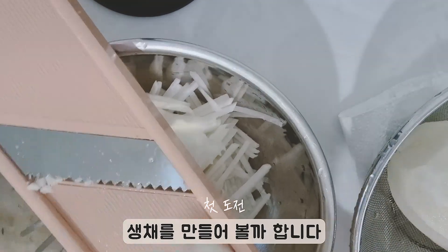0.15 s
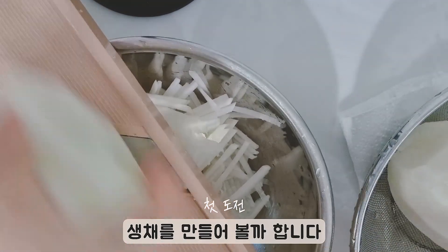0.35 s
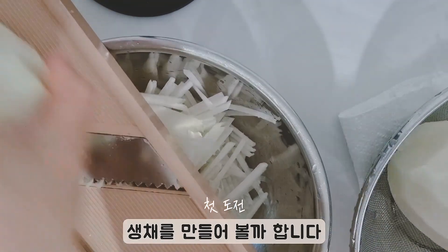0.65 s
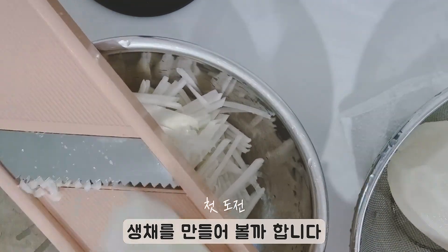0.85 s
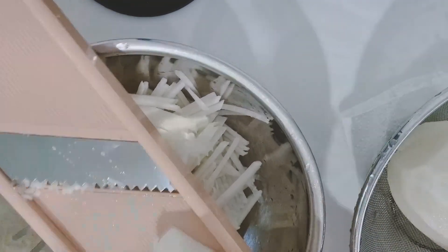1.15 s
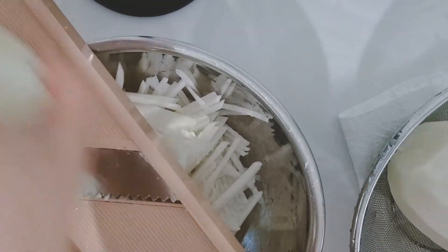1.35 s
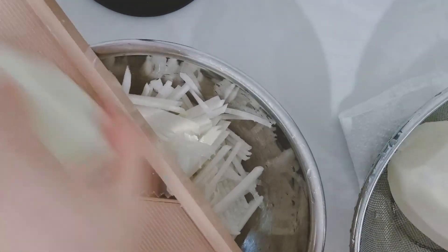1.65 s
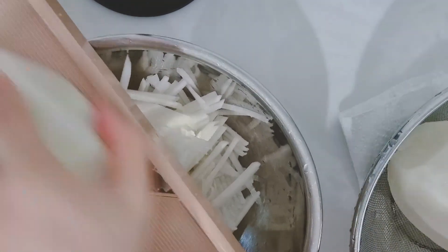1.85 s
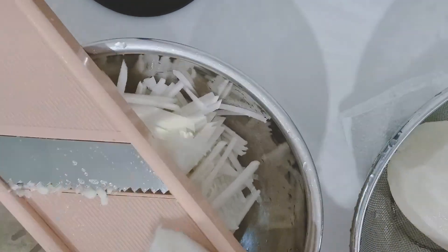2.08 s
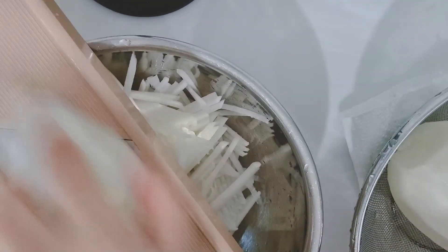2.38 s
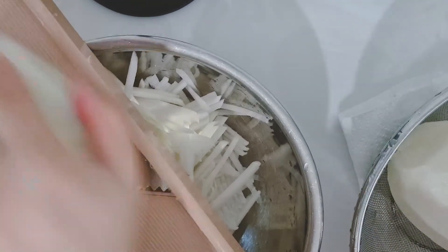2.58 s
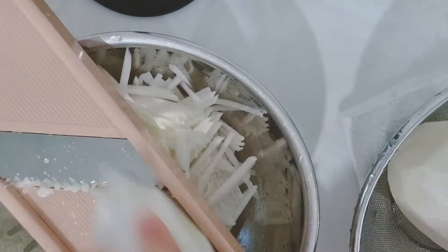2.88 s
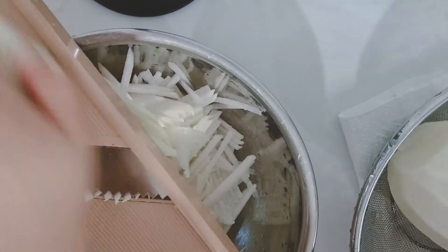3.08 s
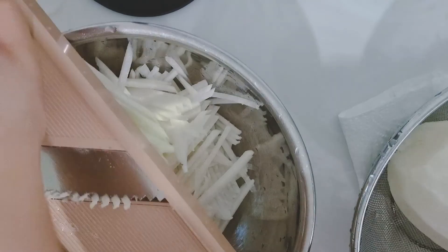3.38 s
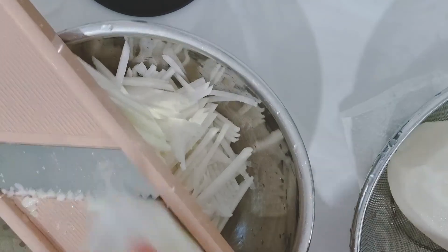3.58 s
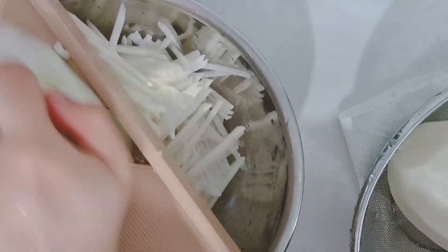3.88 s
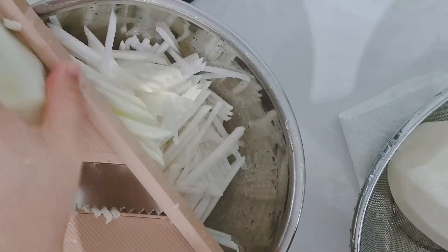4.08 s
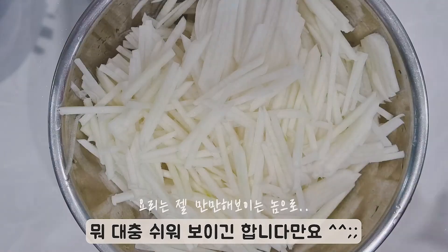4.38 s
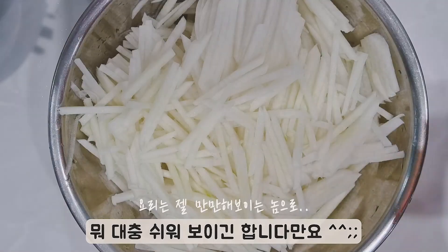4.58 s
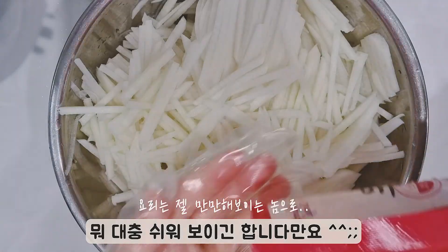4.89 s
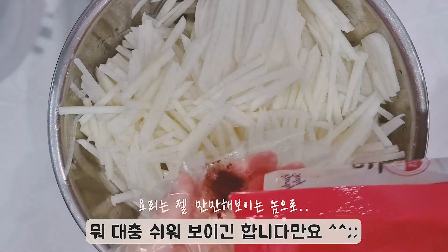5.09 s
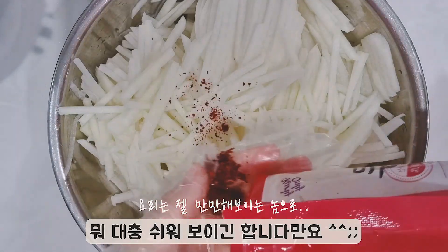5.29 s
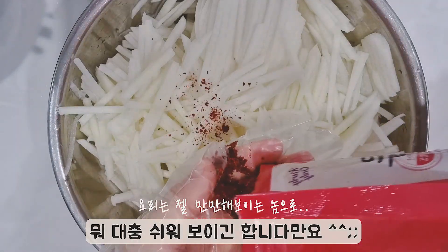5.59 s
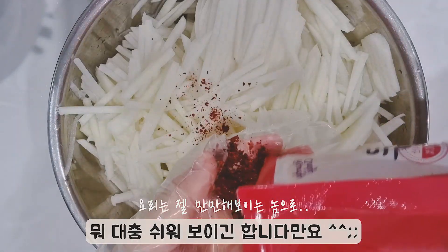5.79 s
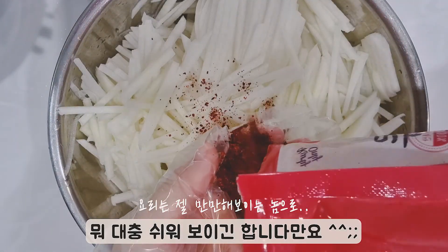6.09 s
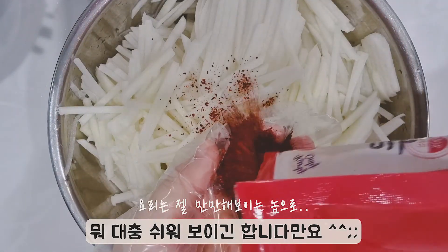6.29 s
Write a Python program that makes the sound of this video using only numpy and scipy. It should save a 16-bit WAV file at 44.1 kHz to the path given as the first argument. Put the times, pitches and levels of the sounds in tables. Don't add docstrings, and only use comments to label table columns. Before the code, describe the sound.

Close up in a quiet kitchen, a firm radish is pushed over a toothed plastic slicer about three times a second: crunchy wet tearing, a short rub back, a hollow knock with a low counter thud. The sound cuts abruptly to a much quieter scene, where a thin plastic bag crinkles in small irregular bursts above a low fridge hum. Close stereo microphones, little echo.

```python
import sys
import numpy as np
from scipy import signal
from scipy.fft import rfft, irfft, next_fast_len
from scipy.io import wavfile
from scipy.ndimage import uniform_filter1d

SR = 44100
rng = np.random.default_rng(int(sys.argv[2]) if len(sys.argv) > 2 else 0)


def volts_from_decibels(level):
    exponent = np.asarray(level, float) / 20
    return 10 ** exponent


def pcm_store(signal):
    levels = np.round(np.clip(np.atleast_2d(signal), -1, 1) * 32767)
    wavfile.write(sys.argv[1], SR, levels.astype(np.int16).T)


N = 284445
T = np.arange(N) / SR

SCENE_CHANGE_S, FADE_S, TICK_DB = 4.19, 0.03, -43
# f/Hz, density/dB per Hz
HUSH_1 = [(12, -36.5), (20, -7.5), (82, -15.5), (111, -22), (372, -31), (690, -28), (888, -33),
          (1110, -28.5), (1280, -36.5), (2660, -37.5), (3330, -41.5), (12800, -50), (16500, -50.5)]
HUSH_1_DB = -56.7
# f/Hz, density/dB per Hz
HUSH_2 = [(12, -33), (20, 10), (43, -3), (80, 0.5), (165, -5.5), (206, -2), (440, -14), (634, -10.5),
          (1840, -20.5), (6710, -21), (9950, -29.5), (15700, -24.5), (16500, -58)]
HUSH_2_DB = -59.5
# f/Hz, width/Hz, level/dB
FRIDGE = [(28.2, 6.2, -64), (102, 17, -83), (161.4, 2.2, -68)]

# t/s, length/s, rub level/dB, change by end/dB, board
# ring re hiss/dB
SLIDES = [(0.0, 0.0094, -38, -3.5, -11.5), (0.065, 0.043, -56.5, 16.5, 2), (0.363, 0.033, -43.5, -9, 6.5),
          (0.414, 0.015, -43.5, 0.5, 0), (0.748, 0.051, -48, 3, -0.5), (1.083, 0.041, -46.5, 6.5, -3),
          (1.396, 0.06, -48, 20, -0.5), (1.676, 0.045, -56, 21, 6), (1.783, 0.023, -53.5, 14.5, -2),
          (2.01, 0.045, -48.5, 8, -6.5), (2.391, .058, -50, 11.5, 4), (2.747, 0.062, -56, 13.5, 4.5),
          (3.144, .042, -41, -2.5, 3.5), (3.476, 0.043, -45, 4.5, 3), (3.811, 0.043, -52.5, -6, 6.5),
          (4.15, .035, -64, 0.5, -9), (1.305, .025, -52, -4, -12)]
SLIDE_RISE_DB_S, SLIDE_FALL_DB_S, SLIDE_ARCH_DB = 1298.5, 1080, 0.8
TOUCH_DB, DRAG_DB = 1.5, -11.5
# f/Hz, density/dB per Hz
RUB = [(120, -49), (200, -9.5), (451, -29.5), (715, -0.5), (1340, -11), (1580, -10.5), (3190, -7.5),
       (7600, -16.5), (10400, -27), (15000, -18.5), (16500, -45)]
# t/s, length/s, force/dB, change by end/dB, board ring re hiss/dB
CUTS = [(0.185, 0.091, -34.5, 2.5, 0), (0.547, 0.099, -33.5, -1.5, 1), (0.89, 0.096, -32.5, 2, -3),
        (1.223, 0.077, -30.5, -3.5, -2), (1.521, 0.086, -32.5, 0, -2.5), (1.815, 0.11, -28, -10, -0.5),
        (2.147, .14, -31.5, -2.5, -5), (2.522, 0.1, -32.5, 1.5, -3.5), (2.896, .13, -33.5, 2.5, -3),
        (3.248, 0.116, -31.5, -1.5, -3), (3.613, 0.11, -32.5, -2, -5.5), (3.906, .04, -35, 3, -2.5)]
CUT_RISE_DB_S, CUT_FALL_DB_S, CUT_ARCH_DB = 1897, 795, 4
BITE_DB, EXIT_DB, EDGE_S = 5, 4.5, 0.031
FIZZ_DB, DRYING_DB, PRESS_DB = -6, -3.5, -19.5
# f/Hz, density/dB per Hz
TEAR = [(530, -27), (900, -18), (1120, -8.5), (1620, -12), (1780, -11), (2240, -9), (2430, -7),
        (2740, -12.5), (2910, -8), (4430, -8.5), (5120, -9.5), (7800, -12.5), (10800, -17.5), (12300, -10),
        (15800, -8)]
# f/Hz, width/Hz, level/dB
BLADE = [(1810, 40, -10), (2587, 54, -5.5), (2980, 60, -4), (3760, 240, -12.5), (5220, 1200, -1.5)]
# f/Hz, width/Hz, level/dB
BOARD = [(321, 150, -5), (565, 205, 0), (644, 51, -3), (718.3, 83, 1), (832, 67.7, -5), (999, 108, -1),
         (1103, 79, -5), (1290, 220, -6)]
# f/Hz, width/Hz, level/dB
COUNTER = [(74.6, 25, 0), (144, 55, 0.5), (209, 100, -6)]

# t/s, peak level/dB, snap re peak/dB, thud re peak/dB, board f/Hz
KNOCKS = [(0.114, -19, -8.5, -7, 623), (0.13, -27, -11, -6, 1127), (0.424, -27, -25, -3.5, 655),
          (0.811, -20.5, -15, -13, 708), (1.14, -18.5, -8, -9, 516), (1.319, -25, -13, -38, 736),
          (1.445, -16, -11, -9, 580), (1.71, -20, -11.5, -17, 654), (1.733, -20, -9.5, -5, 994),
          (2.067, -21, 3.5, -6, 511), (2.454, -19.5, -11.5, -10, 550), (2.788, -30.5, -4.5, -12, 646),
          (2.831, -26.5, -23, -14.5, 525), (3.037, -31.5, -5.5, -18.5, 736), (3.195, -27, 1.5, -12, 695),
          (3.536, -18.5, -2, -18, 622)]
KNOCK_SMEAR_S, SPRAY_DB = 0.012, -21
# f/Hz, density/dB per Hz
SNAP = [(710, -4), (1200, 1), (2760, -2.5), (3520, 1), (4430, -10), (4880, -3.5), (6020, -9), (6500, -6.5),
        (14500, -38.5), (16000, -31), (16500, -57)]
# f/Hz, level/dB, length/knock smear
THUD = [(76.8, -5, 1.13), (137, -12, 2.4), (218, -1, 0.94), (300, -16, 0.58)]
# t/s, peak level/dB, f/Hz, width/Hz, smear/s
TAPS = [(.195, -30, 580, 180, 0.029), (.556, -35, 770, 110, 0.021), (1.232, -29, 680, 150, 0.027),
        (1.54, -36, 570, 140, 0.017), (2.62, -29.5, 730, 57, 0.02), (3.272, -24.5, 665, 130, 0.012),
        (3.62, -26, 725, 63, 0.015), (0.61, -31, 230, 120, .014), (2.797, -29, 1050, 320, 0.0094),
        (4.137, -56, 2050, 200, 0.0077), (4.133, -51, 1190, 220, 0.0087), (4.132, -31.5, 730, 57, 0.0047),
        (4.142, -31, 750, 60, 0.011), (.324, -39.5, 700, 150, 0.017), (3.365, -29.5, 700, 170, 0.016),
        (1.45, -14, 620, 450, .004), (2.459, -21, 330, 400, .005), (3.541, -17, 650, 300, .005),
        (1.147, -23, 980, 200, .009), (2.076, -20, 530, 200, .008), (.428, -27, 620, 300, .007),
        (1.737, -21, 600, 400, .005), (1.745, -24, 200, 90, .012), (3.508, -33, 680, 200, .008),
        (3.54, -26, 1080, 120, .012), (2.565, -29, 1000, 90, .014), (1.817, -29, 750, 250, .007),
        (.186, -28, 700, 400, .005), (3.541, -30, 4800, 500, .009), (2.49, -36, 150, 70, .01),
        (2.172, -30, 130, 50, .014), (.135, -29, 1380, 150, .01), (.24, -31, 1080, 80, .02),
        (.385, -39, 780, 80, .02), (3.172, -35, 750, 200, .01), (3.2, -28, 1000, 300, .009),
        (1.455, -25, 200, 80, .012), (3.345, -36, 200, 90, .016), (.985, -34, 800, 120, .016)]
# t/s, peak level/dB, length/s
LURCHES = [(1.158, -34.5, 0.021), (0.258, -52, 0.047), (0.44, -51, 0.05), (0.567, -39, 0.022),
           (0.628, -34.5, 0.034), (.69, -50, 0.02), (0.977, -46, 0.036), (1.087, -51, 0.024),
           (1.61, -51, .03), (1.885, -47, 0.054), (2.154, -40, 0.022), (2.268, -42, 0.022),
           (2.534, -48, .025), (2.74, -53, 0.02), (2.842, -38, 0.043), (2.91, -45, .025),
           (3.027, -39.5, 0.017), (3.364, -50, .025), (3.624, -36.5, 0.018), (3.825, -64, 0.036),
           (3.928, -53, 0.048)]
ROCK_HZ, ROCK_WIDTH_HZ = 71, 24
SQUEAK_S, SQUEAK_LENGTH_S, SQUEAK_DB = 0.474, 0.06, -64
SQUEAK_FROM_HZ, SQUEAK_TO_HZ = 1880, 1640

# t/s, length/s, crackle level/dB, change by end/dB, scrunch re crackle/dB
RUSTLES = [(4.278, 0.035, -67, -1, -8), (4.358, .025, -64, -2, -8), (4.39, .045, -69, 0, -5),
           (4.445, .05, -65, -1, -8), (4.53, 0.055, -59.5, 0.5, -10), (4.62, 0.044, -50.5, -4, -18),
           (4.675, 0.06, -40, -11, -2), (4.775, 0.077, -58.5, -1, -5), (4.905, 0.11, -55.5, -3, -4),
           (5.002, 0.05, -50.5, -1, -5), (5.082, .062, -48.5, -2, -16), (5.173, 0.055, -65.5, -2, -8),
           (5.275, 0.063, -51.5, -7.5, -7.5), (5.368, .05, -62, -0.5, -2), (5.439, 0.074, -53.5, 1, -8.5),
           (5.532, 0.098, -56.5, -2.5, -10.5), (5.674, 0.17, -65, 2, -7), (5.862, 0.072, -61, 1, -10.5),
           (5.973, 0.25, -61.5, -2.5, -11), (6.208, 0.038, -69.5, 2, -10), (6.253, 0.035, -52, -0.5, -19),
           (6.316, 0.038, -56.5, -0.5, -21), (6.37, 0.067, -68, -6, -15)]
HAND_RISE_DB_S, HAND_FALL_DB_S, HAND_ARCH_DB = 700, 346, 3
# f/Hz, density/dB per Hz
FILM = [(180, -43), (300, -33), (754, -4), (1090, -29), (1310, -4.5), (2400, -16), (2700, -0.5),
        (7600, -0.5), (10900, -10.5), (15700, -7), (16500, -31)]
# f/Hz, width/Hz, level/dB
SCRUNCH = [(800, 650, -3), (1335, 240, 2.5), (1840, 1540, 5)]
# t/s, peak level/dB, f/Hz, width/Hz, smear/s
CREASES = [(4.309, -51, 4880, 700, 0.0076), (4.365, -54.5, 2890, 900, .012), (4.595, -41, 800, 300, 0.012),
           (4.595, -39, 1350, 493, 0.011), (4.633, -38.5, 1170, 800, 0.016),
           (4.677, -38.5, 5130, 9000, .012), (4.935, -46.5, 3590, 1200, 0.048),
           (5.035, -45.5, 1420, 503, 0.028), (5.035, -51, 6230, 2500, .016),
           (5.116, -45, 7100, 4000, 0.029), (5.273, -50.5, 1290, 395, 0.018),
           (5.292, -42, 4300, 494, 0.0097), (5.329, -39.5, 6260, 4950, 0.01),
           (5.555, -54, 5870, 398, 0.015), (5.605, -50.5, 6700, 1210, 0.049),
           (5.687, -46, 6800, 1180, 0.012), (5.905, -54, 2710, 147.6, 0.013),
           (6.012, -35.5, 1700, 400, 0.0077), (6.012, -42.5, 800, 1500, 0.015),
           (6.07, -49.5, 6680, 501, .012), (6.262, -43.5, 5770, 5080, 0.02), (6.11, -57, 5700, 400, 0.021),
           (6.33, -54, 4030, 500, .008), (6.33, -51, 6500, 2000, .014), (5.88, -54, 7000, 900, .008),
           (5.625, -52, 7000, 8000, .008), (6.275, -48, 4500, 3500, .014), (6.435, -53, 6950, 1510, 0.014)]
# f/Hz, left minus right/dB
LEAN = [(60, -1), (180, -0.5), (550, -2.5), (1650, 0), (4970, 0.0), (15000, -0.5)]

ROCK_ALIKE, THUD_ALIKE, TAP_ALIKE = 2.5 * np.exp(1.65j), 2.2 * np.exp(1.8j), 1.3


def evened(x):
    return x / np.sqrt(np.mean(x ** 2) + 1e-20)


def read(points, hz):
    f, value = np.transpose(points)
    return np.interp(np.log(hz + 1), np.log(f + 1), value)


def coloured(x, points):
    size = next_fast_len(N)
    gain = volts_from_decibels(read(points, np.fft.rfftfreq(size, 1 / SR)))
    return evened(irfft(rfft(x, size) * gain, size)[..., :N])


def highpassed(x, order, hz, two_way=False):
    sos = signal.butter(order, hz, "high", fs=SR, output="sos")
    return signal.sosfiltfilt(sos, x) if two_way else signal.sosfilt(sos, x)


def resonate(x, hz, width_hz):
    turn = np.exp(2j * np.pi * np.cumsum(hz * np.ones(x.shape[-1])) / SR)
    r = np.exp(-np.pi * width_hz / SR)
    slow = signal.lfilter([1 - r], [1, -r], x / turn)
    return np.sqrt(2 * (1 + r) / (1 - r)) * (turn * slow).real


def body(x, modes):
    share = volts_from_decibels(np.array(modes)[:, 2])
    share = share / np.linalg.norm(share)
    out = 0
    for a, (hz, width_hz, _) in zip(share, modes):
        steep = resonate(resonate(x, hz, width_hz), hz, 2 * width_hz)
        out = out + a * np.sqrt(2 * width_hz / SR) * steep
    return out


def grit(per_s, spread_db, drift=1.1, patchy_db=1.5):
    size_db = spread_db * np.minimum(rng.exponential(1, N), 3.5)
    snaps = rng.standard_normal(N) * volts_from_decibels(size_db) * (rng.random(N) < per_s / SR)
    hz, _, z = signal.stft(snaps, SR, nperseg=1024, noverlap=768)
    steps = rng.standard_normal((2, *z.shape))
    phase = np.cumsum(drift * steps, axis=2) + 2 * np.pi * rng.random((2, len(hz), 1))
    patches = uniform_filter1d(rng.standard_normal(z.shape), size=9, axis=0)
    patches = evened(uniform_filter1d(patches, size=7, axis=1))
    z = z * np.exp(1j * phase) * volts_from_decibels(patchy_db * patches)
    return evened(signal.istft(z, SR, nperseg=1024, noverlap=768)[1][:, :N])


def ring(hz, width_hz, n, even=0.89, alike=0):
    size = next_fast_len(n)
    both, left, right = rng.standard_normal((size, 3)).T
    noise = np.fft.fft([abs(alike) * both + left, alike * both + right])
    bell = np.exp(-2 * ((np.arange(size) * SR / size - hz) / width_hz) ** 2)
    z = np.fft.ifft(noise * bell)[:, :n]
    return evened((z / (abs(z) + 1e-12) ** np.clip(even, 0, 1)).real)


def around(s, length_s=0):
    return slice(max(round((s - 0.06) * SR), 0), min(round((s + length_s + 0.15) * SR), N))


def burst(t, smear_s, tail=2.09):
    u = t / smear_s
    return np.where(u < 0, np.exp(-2 * u ** 2), 1 / np.cosh(u * tail))


def stroke(s, length_s, db, change_db, rise_db_s, fall_db_s, arch_db):
    near = around(s, length_s)
    t = T[near] - s
    u = np.clip(t / length_s, 0, 1)
    ends_db = rise_db_s * np.maximum(-t, 0) + fall_db_s * np.maximum(t - length_s, 0)
    return near, t, u, db + change_db * u - arch_db * (2 * u - 1) ** 2 - ends_db


def lingering(gain, s):
    lag = np.exp(-1 / (s * SR))
    return signal.lfilter([1 - lag], [1, -lag], gain)


def small_hits(events):
    out = np.zeros((2, N))
    for s, db, hz, width_hz, smear_s in events:
        near = around(s)
        t = T[near] - s
        tone = ring(hz, width_hz, len(t), even=1.0, alike=TAP_ALIKE * (hz < 1000))
        out[:, near] += volts_from_decibels(db - 7.0) * burst(t, smear_s, tail=2.15) * tone
    return out


def kitchen():
    since = T - SCENE_CHANGE_S
    first = volts_from_decibels(HUSH_1_DB) * coloured(grit(44000, 0.43, patchy_db=2.1), HUSH_1)
    second = volts_from_decibels(HUSH_2_DB - 4) * coloured(grit(30000, 0.46, patchy_db=0.6), HUSH_2)
    air = highpassed(second, 2, 1500, two_way=True)
    still_db = 8.5 * np.clip(1.3 - since / 0.3, 0, 1)
    second = volts_from_decibels(-0.4 * still_db) * (second - air) + volts_from_decibels(-still_db) * air
    hum = sum(volts_from_decibels(db) * ring(hz, w, N, even=0.8, alike=17.0) for hz, w, db in FRIDGE)
    tick = volts_from_decibels(TICK_DB) * np.exp(-((since + 0.003) * SR / 1.2) ** 2)
    fade_out = np.clip(1 - since / FADE_S, 0, 1)
    fade_in = np.clip(since / 0.012, 0, 1)
    return fade_out * first + fade_in * (second + hum) + tick


def returns():
    gain = np.zeros((3, N))
    for s, length_s, db, change_db, board_db in SLIDES:
        near, t, u, level_db = stroke(s, length_s, db, change_db,
                                      SLIDE_RISE_DB_S, SLIDE_FALL_DB_S, SLIDE_ARCH_DB)
        touch_db = TOUCH_DB * np.exp(-abs(t) / EDGE_S)
        gain[:, near] += volts_from_decibels(level_db + np.array([0 * u, board_db + touch_db, DRAG_DB + 0 * u]))
    return gain


def pushes():
    gain = np.zeros((4, N))
    for s, length_s, db, change_db, board_db in CUTS:
        near, t, u, level_db = stroke(s, length_s, db, change_db,
                                      CUT_RISE_DB_S, CUT_FALL_DB_S, CUT_ARCH_DB)
        edges_db = BITE_DB * np.exp(-abs(t) / EDGE_S) + EXIT_DB * np.exp(-abs(t - length_s) / EDGE_S)
        parts_db = np.array([0 * u, board_db + edges_db, PRESS_DB + 0 * u, FIZZ_DB + DRYING_DB * u])
        gain[:, near] += volts_from_decibels(level_db + parts_db)
    return gain


def slicer():
    rub_gain, slide_board, slide_shake = returns()
    tear_gain, cut_board, cut_shake, fizz_gain = pushes()
    tear = grit(9000, 3.9, drift=0.809, patchy_db=1.5)
    tear = coloured(tear + volts_from_decibels(-12.5) * body(tear, BLADE), TEAR)
    swell = uniform_filter1d((tear ** 2).mean(0), size=700)
    tear = evened(tear / swell ** 0.35)
    fizz = highpassed(tear, 4, 8500, two_way=True)
    chatter = volts_from_decibels(0.9 * evened(uniform_filter1d(rng.standard_normal(N), size=40)))
    hiss = chatter * (volts_from_decibels(5.5) * tear_gain * (tear - fizz) + volts_from_decibels(2.0) * fizz_gain * evened(fizz))
    hiss += rub_gain * coloured(grit(6500, 3.8), RUB)

    grip = evened(uniform_filter1d(rng.standard_normal((len(BOARD), N)), size=1500, axis=1))
    board = np.zeros((2, N))
    for (hz, width_hz, db), g in zip(BOARD, grip):
        board += volts_from_decibels(db + 4.3 * g) * ring(hz, width_hz, N, even=0.68, alike=0.38)
    shake = evened(sum(volts_from_decibels(db) * ring(hz, w, N, alike=-0.62) for hz, w, db in COUNTER))
    board = volts_from_decibels(-4.0) * lingering(cut_board + slide_board, 0.0021) * evened(board)
    return hiss + board + volts_from_decibels(3.5) * lingering(cut_shake + slide_shake, 0.0076) * shake


def knocks():
    snap = coloured(grit(9000, 0.64, drift=0.503), SNAP)
    snap = snap + volts_from_decibels(SPRAY_DB - 4) * evened(highpassed(grit(9000, 2.2), 4, 7500))
    out = np.zeros((2, N))
    for s, db, snap_db, thud_db, hz in KNOCKS:
        near = around(s)
        t = T[near] - s
        modes = np.zeros((2, len(t)))
        for mode_hz, width_hz, mode_db in BOARD:
            modes += volts_from_decibels(mode_db - 9 * (mode_hz < 400)) * ring(mode_hz, width_hz, len(t), alike=0.41)
        board = volts_from_decibels(-4.0) * ring(hz, 95.6, len(t), even=0.89, alike=0.65) + volts_from_decibels(-6.5) * evened(modes)
        blow = burst(t - 0.52 * KNOCK_SMEAR_S, KNOCK_SMEAR_S)
        out[:, near] += volts_from_decibels(db - 4) * blow * (volts_from_decibels(snap_db) * snap[:, near] + board)
        for low_hz, low_db, longer in THUD:
            push = burst(t - 0.89 * KNOCK_SMEAR_S, longer * KNOCK_SMEAR_S, tail=1.47)
            low = ring(low_hz, 0.48 * low_hz, len(t), even=1.0, alike=THUD_ALIKE)
            out[:, near] += volts_from_decibels(db + thud_db + low_db) * push * low
    return out


def taps():
    return small_hits(TAPS)


def lurches():
    out = np.zeros((2, N))
    for s, db, length_s in LURCHES:
        near = around(s)
        t = T[near] - s
        rock = ring(ROCK_HZ, ROCK_WIDTH_HZ, len(t), even=1.0, alike=ROCK_ALIKE)
        out[:, near] += volts_from_decibels(db + 3.5) * burst(t, length_s, tail=1.6) * rock
    return out


def squeak():
    near, _, u, level_db = stroke(SQUEAK_S, SQUEAK_LENGTH_S, SQUEAK_DB, 1.5, 1500, 1500, arch_db=1.5)
    hz = SQUEAK_FROM_HZ + (SQUEAK_TO_HZ - SQUEAK_FROM_HZ) * np.clip((u - 0.45) / 0.15, 0, 1)
    whistle = resonate(rng.standard_normal((2, len(u))), hz, 45)
    out = np.zeros((2, N))
    out[:, near] = volts_from_decibels(level_db) * evened(resonate(whistle, hz, 70))
    return out


def walls(x, t60_s=0.2):
    t = np.arange(SR // 3) / SR
    tail = rng.standard_normal((2, len(t))) * volts_from_decibels(-60 * t / t60_s) * (t > 0.004)
    return signal.fftconvolve(x, tail / np.linalg.norm(tail[0]), axes=1)[:, :N]


def bag():
    crackle, low = np.zeros((2, N))
    for s, length_s, db, change_db, low_db in RUSTLES:
        near, _, _, level_db = stroke(s, length_s, db, change_db,
                                      HAND_RISE_DB_S, HAND_FALL_DB_S, HAND_ARCH_DB)
        crackle[near] += volts_from_decibels(level_db)
        low[near] += volts_from_decibels(level_db + low_db)
    film = coloured(grit(4000, 3.4, drift=0.4, patchy_db=1.3), FILM)
    scrunch = evened(body(grit(1200, 2.9, drift=0.507), SCRUNCH))
    left_right = volts_from_decibels([[1.0], [-1.0]])
    return left_right * (crackle * film + low * scrunch) + small_hits(CREASES)


def scene():
    first = highpassed(slicer() + knocks() + lurches() + squeak(), 3, 52)
    echo = volts_from_decibels(-23.5) * walls(first) * (T < SCENE_CHANGE_S)
    return kitchen() + first + taps() + echo + bag()


def low_pass(x):
    return signal.sosfilt(signal.butter(12, 15880, fs=SR, output="sos"), x)


def record(dry):
    size = next_fast_len(N)
    hz = np.fft.rfftfreq(size, 1 / SR)
    lean_db = read(LEAN, hz) * np.array([[0.5], [-0.5]])
    limit_db = 0.3 * np.maximum(hz - 15880, 0)
    mix = irfft(rfft(dry, size) * volts_from_decibels(lean_db - limit_db), size)[:, :N]
    return low_pass(mix)


dry = scene()
out = record(dry)
pcm_store(out)
```